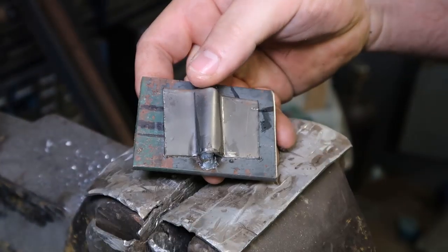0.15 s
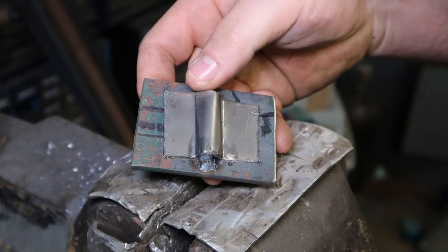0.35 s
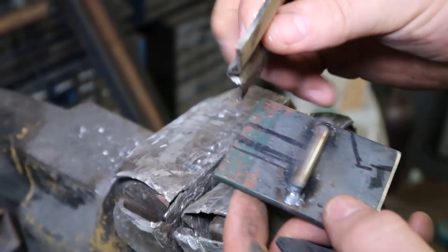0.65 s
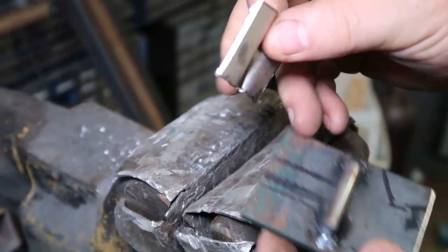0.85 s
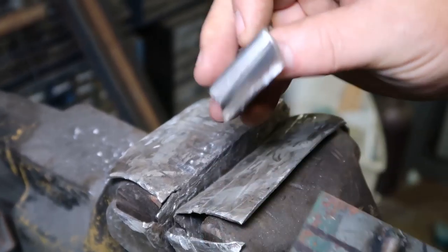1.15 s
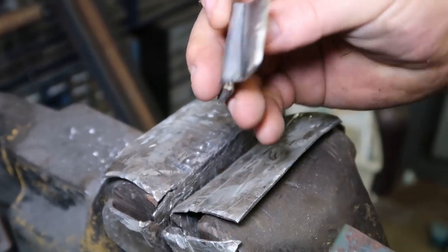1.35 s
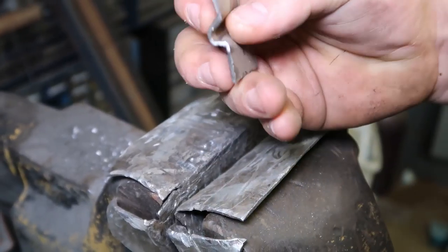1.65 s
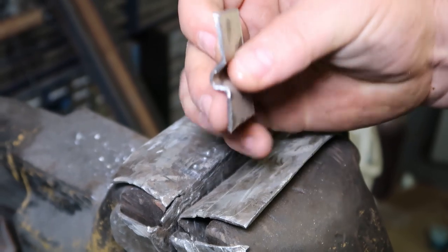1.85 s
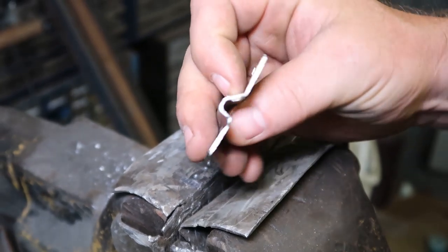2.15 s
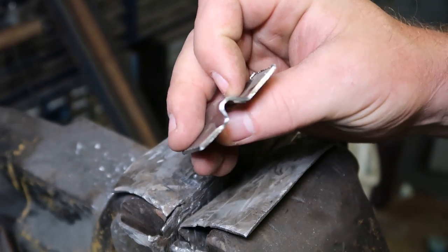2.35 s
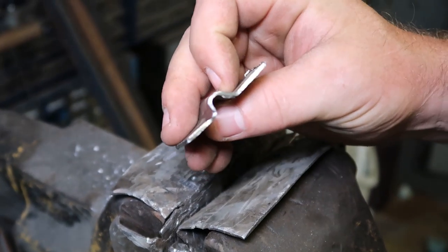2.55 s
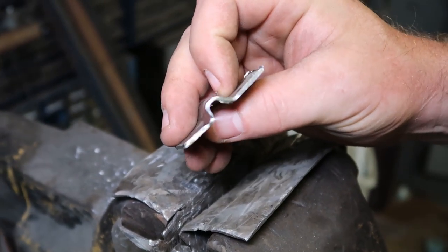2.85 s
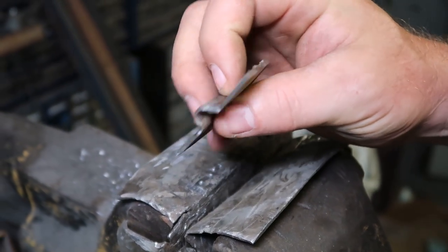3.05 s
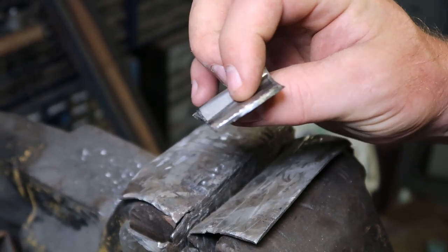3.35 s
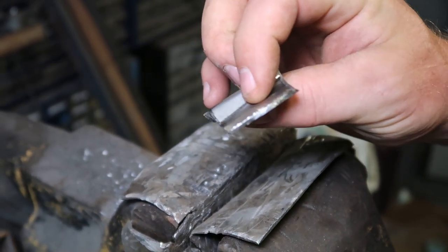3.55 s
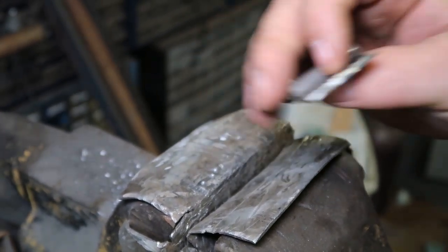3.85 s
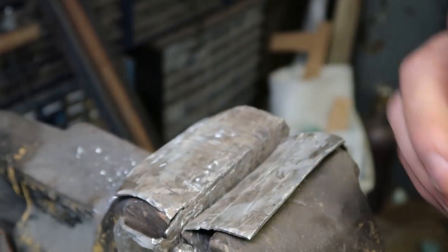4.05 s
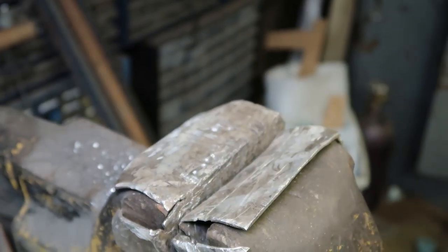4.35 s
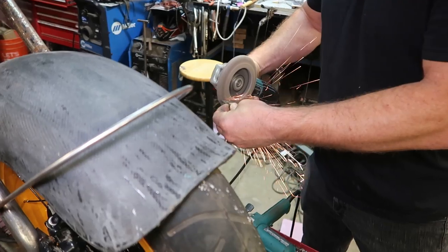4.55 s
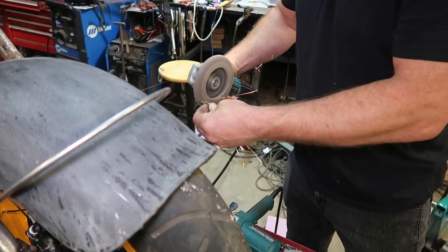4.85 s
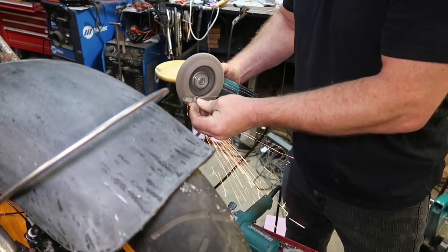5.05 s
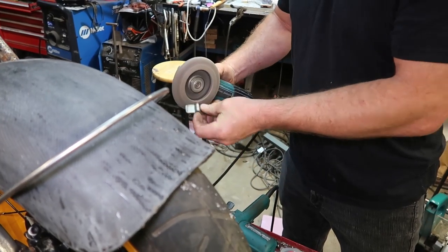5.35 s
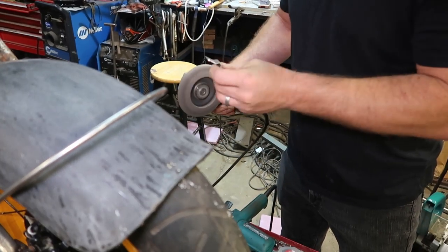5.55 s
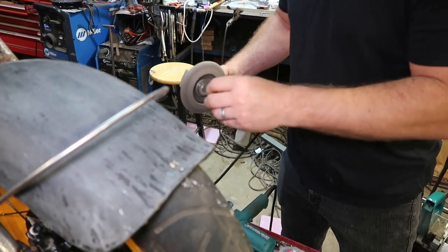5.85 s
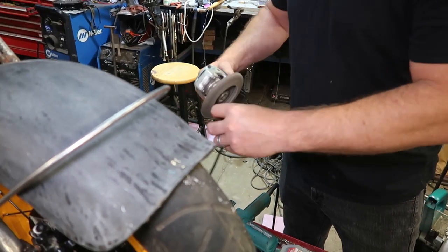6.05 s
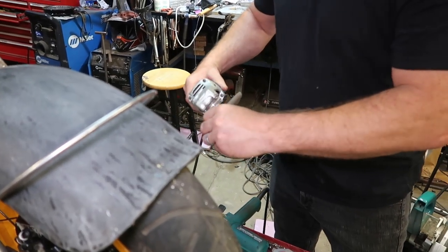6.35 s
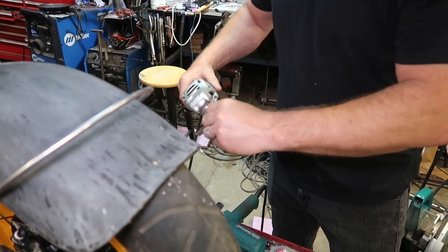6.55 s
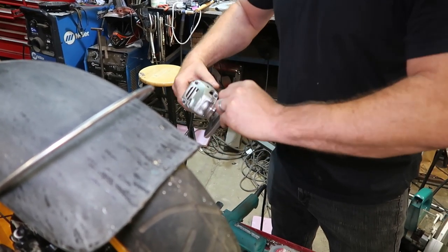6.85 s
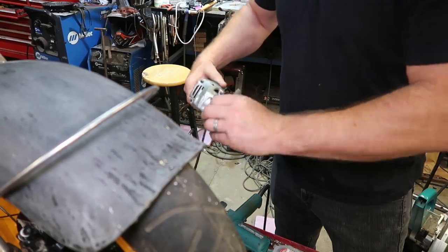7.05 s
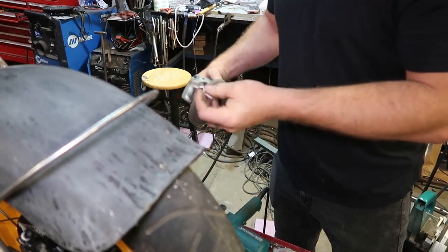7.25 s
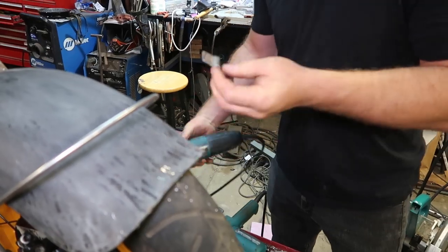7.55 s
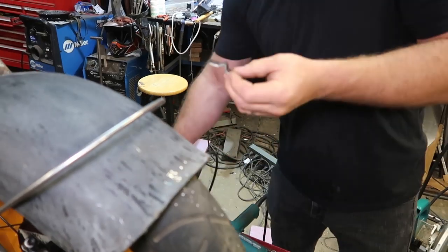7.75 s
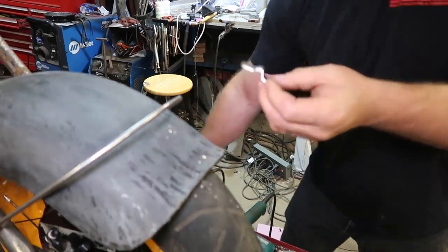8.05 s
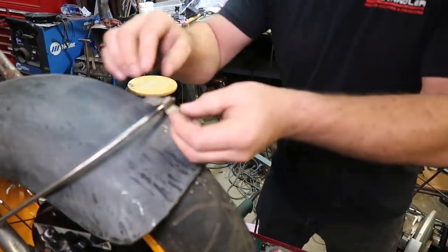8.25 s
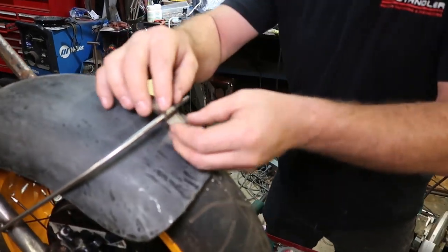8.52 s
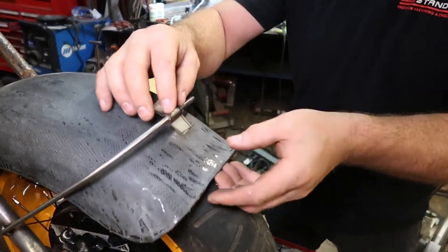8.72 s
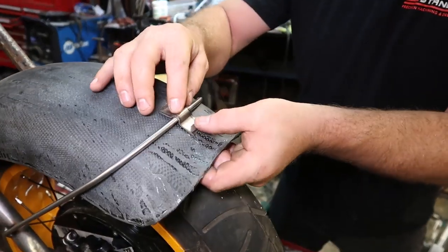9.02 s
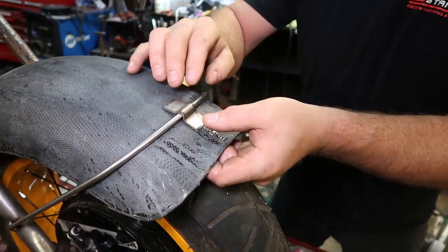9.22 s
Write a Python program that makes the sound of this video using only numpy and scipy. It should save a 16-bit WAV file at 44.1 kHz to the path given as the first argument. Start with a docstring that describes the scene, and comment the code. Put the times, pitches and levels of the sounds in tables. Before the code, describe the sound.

From 0 to 4.5 s a workshop fan drones: a steady hum near 730 Hz over soft, dull air rush, with a soft bump at about 0.6 s. A small steel bracket clinks on a vice at 4.08 s, with tiny bounces, and more faintly at 4.24 s. A very brief silence, then at 4.5 s a close angle grinder cuts in, bright hiss and whine, with low rumble at first. Power drops at 5.4 s and it coasts down, whooshing and singing, until a short raspy catch at 6.1 s. It whines back to speed, runs until 7.1 s, then slides down again. From 7.94 to 8.1 s it is laid down with metallic ticks, scrapes and low bench thuds. The fan, now about 2200 Hz, emerges. Light bracket taps on a steel fender come at 8.82, 8.88, 8.98, 9.09 and faintly 9.27 s, with brief hums.

```python
"""A workshop, where a seven-bladed fan drones: filtered noise for its air, sines at multiples of the shaft rate.
A small steel bracket turned in the fingers clinks on a vice: struck, ringing modes. A short silence follows.
In the second scene the fan drones three times higher. An angle grinder (hiss, tones and whooshes that follow
its disc and motor) dresses the bracket, coasts, restarts, coasts again and is laid down with ticks and thuds.
Then the bracket taps on a sheet-steel fender, which rings and hums."""
import sys
import numpy as np
from scipy import signal
from scipy.fft import rfft, irfft, next_fast_len
from scipy.io import wavfile
from scipy.ndimage import uniform_filter1d, map_coordinates

SR = 44100
rng = np.random.default_rng(int(sys.argv[2]) if len(sys.argv) > 2 else 0)


def master(y):
    """Save y as 16-bit WAV."""
    cut = np.clip(np.atleast_2d(y).T, -1, 1)
    pcm = np.round(cut * 32767)  # scale
    wavfile.write(sys.argv[1], SR, pcm.astype(np.int16))


N = 413658
M = next_fast_len(N)
SPAN = 5 * SR   # samples that cover either scene: the first from the start, the second up to the end
FIRST_END_S, SECOND_START_S = 4.491, 4.5095   # silence in between
SHAFT_HZ, SECOND_SHAFT_RATIO = 104.8, 2.997   # fan shaft rate in the first scene; times this in the second
GEAR = 3.68   # motor turns per disc turn
FULL_TURNS = 440   # disc turns per s at which the speed-dependent levels hold
CUTOFF_HZ = 15800

# resonances of the grinder's guard and housing: f/Hz, width/Hz, level/dB
HOUSING = [(3730, 180, 2), (4135, 290, 3.5), (4860, 940, 6.5), (6620, 170, 3.5), (7560, 160, 1),
           (9520, 260, 5.5), (10900, 510, -0.5), (12600, 280, -2)]


def from_db(db):
    """Decibels to amplitude."""
    return np.exp(np.asarray(db) * np.log(10) / 20)


def rms_one(x):
    """Scale to an rms of 1."""
    return x / np.sqrt(np.mean(x ** 2) + 1e-20)


def filtered(x, order, hz, kind="low"):
    """Butterworth filter."""
    return signal.sosfilt(signal.butter(order, hz, kind, fs=SR, output="sos"), x)


def in_time(rows):
    """Columns of a table whose first is time, one value a sample."""
    s, *columns = np.transpose(rows)
    return [np.interp(np.arange(N) / SR, s, c) for c in columns]


def bins_hz(size):
    """Frequency of every FFT bin, at least 1 Hz."""
    return np.maximum(np.arange(size // 2 + 1) * SR / size, 1)


def at_hz(points, size=M):
    """A spectrum table read at every FFT bin, straight lines over log frequency."""
    hz, value = np.transpose(points)
    return np.interp(np.log(bins_hz(size)), np.log(hz), value)


def humped(humps, size=M):
    """Bell-shaped boosts or dips in dB at every FFT bin."""
    return sum(db / (1 + (2 * (bins_hz(size) - hz) / width_hz) ** 2) for hz, width_hz, db in humps)


def swells(rows):
    """Bell-shaped envelopes, summed by power; computed every 32 samples."""
    t = np.arange(0, N, 32) / SR
    power = sum(from_db(2 * db) * np.exp(-(2 * (t - s) / length) ** 2) for s, length, db, *_ in rows)
    return np.interp(np.arange(N) / SR, t, np.sqrt(power))


def drift(rate, size=N):
    """Slow chance of spread 1: noise through a two-pole low-pass at rate Hz, drawn every 40 samples."""
    r = np.exp(-80 * np.pi * rate / SR)
    noise = rng.standard_normal(size // 40 + 2002)
    slow = signal.lfilter([1], [1, -2 * r, r * r], noise)[2000:]   # skip the settling
    return np.interp(np.arange(size) / 40, np.arange(len(slow)), rms_one(slow))


def tone(hz, waver_db, rate):
    """A sine along a pitch curve; height and phase waver together, and it is silent above the cutoff."""
    waver = waver_db * drift(rate, size=len(hz))
    phase = 2 * np.pi * np.cumsum(hz) / SR + 0.065 * waver
    return np.sqrt(2) * from_db(waver) * np.sin(phase + rng.uniform(0, 2 * np.pi)) * (hz < CUTOFF_HZ)


def whoosh(hz, half_width_hz):
    """Narrow noise of rms 1 along a pitch curve: two low-passed noises on sine and cosine carriers."""
    breadth = filtered(rng.standard_normal((2, len(hz))), 2, half_width_hz)
    phase = 2 * np.pi * np.cumsum(hz) / SR
    return rms_one(breadth[0] * np.sin(phase) + breadth[1] * np.cos(phase))


def ring(clicks, hz, t60):
    """A two-pole resonator: a unit click sets a decaying sine ringing."""
    r, w = from_db(-60 / (t60 * SR)), 2 * np.pi * hz / SR
    return signal.lfilter([0, np.sin(w)], [1, -2 * r * np.cos(w), r * r], clicks + 1e-18)


def strike(events, modes, gain_db, uneven_db, crack_db, crack_s, soft_hz):
    """Every blow excites every mode with its own strength and cracks; an optional third column tilts the blow."""
    rows = np.array(events)
    at = (rows[:, 0] * SR).astype(int)
    blow_db = rows[:, 1]
    tilt = rows[:, 2] if rows.shape[1] > 2 else 0
    first = at.min()
    size = min(at.max() + SR // 3, N) - first
    ringing = np.zeros(size)
    luck_db = rng.normal(0, uneven_db, (len(rows), len(modes)))
    for k, (hz, level_db, t60) in enumerate(modes):
        clicks = np.zeros(size)
        clicks[at - first] = from_db(blow_db + level_db + gain_db + luck_db[:, k] + tilt * np.log2(hz / 2000))
        ringing += ring(clicks, hz, t60) * (-1) ** k   # alternate signs
    clicks = np.full(size, 1e-18)
    clicks[at - first] = from_db(blow_db + crack_db + tilt)
    decay = signal.lfilter([1], [1, -np.exp(-1 / (crack_s * SR))], clicks)
    crack = np.diff(decay * rng.standard_normal(size), prepend=0)   # differencing brightens it
    out = filtered(ringing + crack, 2, min(soft_hz, .45 * SR))
    return np.pad(out, (first, N - first - size))


def fan(shaft_hz, orders, air, humps, air_db):
    """Air rushing through broad resonances, with tones at multiples of the shaft rate; one span long."""
    colour_db = at_hz(air) + humped(humps)
    rush = rms_one(irfft(rfft(rng.standard_normal(M)) * from_db(colour_db), M)[:SPAN])
    tones = sum(from_db(db) * tone(np.full(SPAN, k * shaft_hz), waver_db=1.3, rate=13.0) for k, db in orders)
    return from_db(air_db + 0.74 * drift(16.5, size=SPAN)) * rush + tones


def first_fan():
    """The fan of the first scene; seven blades pass per shaft turn, so the seventh multiple leads."""
    # shaft tones: multiple of shaft rate, level/dB
    order_rows = [(2, -60.5), (4, -60.5), (5, -53), (6, -51), (8, -50.5), (14, -48), (15, -56), (16, -49.5),
                  (21, -64.5), (24, -56.5), (28, -57.5)]
    # relative spectrum of the air: f/Hz, level/dB
    air_rows = [(15, -61), (25, -35.5), (60, -26.5), (117, -29.5), (200, -15.5), (278, -13), (469, -17.5),
                (731, -18.5), (1330, -23), (1600, -22.5), (2100, -25.5), (5200, -34.5), (8120, -49.5),
                (12000, -62), (13500, -100)]
    # housing and room resonances: f/Hz, width/Hz, level/dB
    hump_rows = [(283, 25, 7), (365, 12, 9.5), (610, 210, 4.5), (710, 57, 4), (1178, 43, 5.5),
                 (1600, 160, 1.5), (2510, 200, 2), (5260, 250, 1), (436, 127, -12)]
    # blade tone: t/s, level/dB
    blade_rows = [(0, -33), (.3, -31), (.57, -35.5), (.6, -29.5), (1.3, -31.5), (4.48, -31.5)]
    body = np.pad(fan(SHAFT_HZ, order_rows, air_rows, hump_rows, air_db=-35), (0, N - SPAN))
    blade = tone(np.full(N, 7 * SHAFT_HZ), waver_db=0.87, rate=18.0)
    return body + from_db(in_time(blade_rows)[0]) * blade


def thumps():
    """Soft low bumps: one smooth push of 2.2 ms each."""
    # t/s, peak/dB
    thump_rows = [(0.586, -34), (5.4, -54), (6.107, -61)]
    out, push = np.zeros(N), np.hanning(int(0.0022 * SR))
    for s, peak_db in thump_rows:
        out[int(s * SR):int(s * SR) + len(push)] += from_db(peak_db) * push
    return out


def clinks():
    """Steel on steel: each blow and bounce on the vice rings the bracket's modes."""
    # blows and bounces, relative: t/s, level/dB, brightness/dB per octave
    blow_rows = [(4.079, -10.5, -1.5), (4.082, -23, 6), (4.086, -26, 7), (4.2385, -19, -3.5),
                 (4.2425, -38, 4)]
    # bracket modes: f/Hz, level/dB, t60/s
    mode_rows = [(2420, -6, .018), (2643, -6, 0.022), (3200, -5, 0.018), (3700, -10, .012),
                 (4490, -5, 0.125), (4560, -2, .03), (4950, -5, 0.04), (5650, -9, 0.025), (7200, -19, 0.05),
                 (9534, -23, .04), (10970, -21, .04)]
    struck = strike(blow_rows, mode_rows, gain_db=-5, uneven_db=1.5, crack_db=-25, crack_s=.003, soft_hz=6500)
    return filtered(struck, 10, 11600)


def second_fan():
    """The fan of the second scene, its tones three times higher and its level uneven."""
    # shaft tones: multiple of shaft rate, level/dB
    order_rows = [(4, -59), (6, -54), (8, -57), (12, -52), (16, -56), (21, -55), (28, -64)]
    # relative spectrum of the air: f/Hz, level/dB
    air_rows = [(15, -60), (25, -38), (75, -46), (200, -34.5), (324, -21), (555, -24.5), (727, -4.5),
                (1460, -15), (1900, -8), (2500, -7), (3470, -14.5), (4300, -15.5), (6450, -19.5),
                (15700, -25.5)]
    # resonances: f/Hz, width/Hz, level/dB
    hump_rows = [(733, 85, 6), (1160, 67, 5.5), (1300, 190, -11), (163, 33, 8)]
    # gain of all but the blade tones, sinking under the grinder, rising briefly at the thuds: t/s, level/dB
    gain_rows = [(4.5, -6), (5.3, -22.5), (5.7, -7.5), (6.0, -4.5), (6.3, -10.5), (7.0, -10), (7.7, -4.5),
                 (7.98, 0), (8.0, 4.5), (8.06, 1.5), (8.1, 8), (8.14, 1), (8.26, 1), (8.5, -0.5), (8.8, 1),
                 (9.38, 0)]
    # blade tone and its octave: t/s, tone level/dB, octave level/dB
    blade_rows = [(4.5, -51, -66), (5.3, -63, -62), (6.0, -44, -57), (6.2, -51, -68), (7.1, -53, -69),
                  (7.3, -48, -50), (7.6, -42, -48), (7.9, -38, -44.5), (8.1, -38, -50), (8.14, -39, -54),
                  (8.27, -37.5, -61), (8.52, -35, -62), (8.9, -34, -51), (9.38, -34, -56)]
    shaft_hz = SECOND_SHAFT_RATIO * SHAFT_HZ
    body = np.pad(fan(shaft_hz, order_rows, air_rows, hump_rows, air_db=-38), (N - SPAN, 0))
    blade_db, octave_db = in_time(blade_rows)
    blade = from_db(blade_db) * tone(np.full(N, 7 * shaft_hz), waver_db=1.0, rate=13.0)
    octave = from_db(octave_db) * tone(np.full(N, 14 * shaft_hz), waver_db=1.0, rate=13.0)
    return from_db(in_time(gain_rows)[0]) * body + blade + octave


def disc():
    """Speed closes on the loaded speed under power and decays when coasting; tones and grit follow both."""
    # spells under power: start t/s, end t/s, starting speed/turns per s, wobble tone level/dB,
    # its octave level/dB, gear whine level/dB, share of the hiss that repeats each turn/0-1
    pass_rows = [(4.5, 4.92, 440, -51, -75, -58, .5), (4.92, 5.39, 425, -69, -80, -52, .2),
                 (6.11, 7.11, 345, -61, -62, -34, .09)]
    # speed the motor pulls towards: t/s, disc speed/turns per s
    loaded_rows = [(4.5, 438), (4.6, 425), (4.72, 405), (4.82, 425), (4.95, 447), (5.1, 444), (5.39, 439),
                   (6.1, 350), (6.19, 352), (6.2, 520), (6.33, 470), (6.45, 461), (6.6, 468), (6.8, 474),
                   (7.11, 464)]
    # motor tone under power, then coasting: disc speed/turns per s, level/dB
    powered_rows = [(300, -71), (445, -57), (460, -51), (472, -50)]
    coasting_rows = [(80, -90), (135, -68), (160, -57), (220, -52), (270, -49), (350, -50), (400, -58),
                     (430, -66)]
    # the whine is strongest on the climb to full speed: disc speed/turns per s, level/dB
    gear_rows = [(370, -22), (398, -2), (440, -1), (461, 0), (466, -4), (472, -6)]
    spin_up_s, coast_s, switch_s = .15, .91, .12   # time constants; averaging time of the level changes
    friction, slowest = 160, 80   # bearing drag (turns per s per s) when coasting, down to a crawl (turns per s)

    t, step = np.arange(N - SPAN, N) / SR, 40
    on = np.array([(t >= start) & (t < end) for start, end, *_ in pass_rows])
    powered, pull = on.any(axis=0), in_time(loaded_rows)[0][-SPAN:]
    speed = [pull[0]]
    starts = {int((s - t[0]) * SR) // step: first for s, _, first, *_ in pass_rows}
    driven = powered | (t < SECOND_START_S)
    for k, (drive, goal) in enumerate(zip(driven[::step], pull[::step])):
        speed[-1] = starts.get(k, speed[-1])
        change = (goal - speed[-1]) / spin_up_s if drive else -speed[-1] / coast_s - friction
        speed.append(speed[-1] + step / SR * change)
    turns = np.interp(np.arange(SPAN) / step, np.arange(len(speed)), np.maximum(speed, slowest))

    _, _, _, wobble_db, octave_db, gear_db, repeats = np.transpose(pass_rows) @ on
    wobble_db = np.where(powered, wobble_db, -60.5) + 13 * np.log2(turns / FULL_TURNS)
    motor_on_db = np.interp(turns, *np.transpose(powered_rows))
    motor_off_db = np.interp(turns, *np.transpose(coasting_rows))
    motor_db = np.where(powered, motor_on_db, motor_off_db)
    gear_db = np.where(powered, gear_db + np.interp(turns, *np.transpose(gear_rows)), -80)
    octave_db = np.where(powered, octave_db, -80)
    repeats = np.where(powered, repeats, 0.0091)
    settings = [wobble_db, octave_db, motor_db, gear_db, repeats]
    return turns, *uniform_filter1d(settings, int(switch_s * SR))


def hiss_db():
    """The reference level of the grinder hiss, dying away after its last point."""
    # t/s, level/dB
    hiss_rows = [(4.52, -28.5), (4.8, -29), (5.03, -29.5), (5.4, -28), (5.94, -25), (6.08, -27),
                 (6.17, -28.5), (6.3, -27), (7.2, -27.5), (7.6, -25), (7.9, -30)]
    s, db = hiss_rows[-1]
    end_s, fade_db_per_s = 8.22, 21
    return in_time(hiss_rows + [(end_s, db - fade_db_per_s * (end_s - s)), (end_s + .1, -90)])[0]


def grinding_hiss(turns, repeats):
    """Contact noise: a rough rim passing again each turn plus fresh noise, in bands that follow disc speed."""
    # overlapping bands: f/Hz, level/dB, speed slope/dB per octave of disc speed
    band_rows = [(288, -81, 11), (920, -28, 3.5), (2270, -12.5, 1), (4900, -7.5, 5), (8340, -2, 4),
                 (10940, -4, 2.5), (14200, 2, 8.5)]
    angle = np.cumsum(turns * (1 + .002 * drift(24.6, size=SPAN))) / SR
    grit = rng.standard_normal((400, 129))   # the rim wears into a new pattern row by row, 30 rows a second
    grit[:, -1] = grit[:, 0]   # close the circle
    rim = map_coordinates(grit, [np.arange(SPAN) / SR * 30.0, angle % 1 * 128], order=1)
    rim = rms_one(filtered(np.diff(rim, prepend=0), 2, 7500, "high"))   # repeating grit is heard mostly up here
    repeats = np.clip(repeats, 0, 1)
    contact = np.sqrt(repeats) * rim + np.sqrt(1 - repeats) * rng.standard_normal(SPAN)
    spectrum = rfft(contact) * from_db(humped(HOUSING, size=SPAN))
    hiss, together, level_db = 0, drift(29, size=SPAN), hiss_db()[-SPAN:]
    for centre_hz, band_db, speed_db in band_rows:
        peak = [(16, 0.026)] + [(hz, hz == centre_hz) for hz, *_ in band_rows]   # one at its own centre
        band = at_hz(peak, size=SPAN) ** 1.31
        gain_db = level_db + band_db + speed_db * np.log2(turns / FULL_TURNS)
        gain_db = gain_db + 0.63 * together + 0.45 * drift(34, size=SPAN)
        hiss = hiss + from_db(gain_db) * rms_one(irfft(spectrum * band, SPAN))
    return hiss


def motor_and_gears(turns, motor_db, gear_db):
    """Tones locked to the motor rate, and blurred whooshes that slide through the housing resonances."""
    # motor tones, then gear tones: multiple of motor rate, level/dB
    motor_rows = [(1, -1.5), (24, 13)]
    gear_rows = [(4, -1.5), (11, -2)]
    # whooshes: multiple of motor rate, level/dB, half-width/Hz
    whoosh_rows = [(4, 6, 170), (10.33, 17, 200)]
    # colour of the whooshes: f/Hz, level/dB
    colour_rows = [(3000, 0), (8500, 0), (11000, -10), (16000, -20)]
    motor_hz = GEAR * turns
    motor = sum(from_db(motor_db + db) * tone(k * motor_hz, waver_db=2.5, rate=15.0) for k, db in motor_rows)
    gears = sum(from_db(gear_db + db) * tone(k * motor_hz, waver_db=2.5, rate=25.0) for k, db in gear_rows)
    sliding = sum(from_db(motor_db + db) * whoosh(k * motor_hz, width) for k, db, width in whoosh_rows)
    colour_db = humped(HOUSING, size=SPAN) + at_hz(colour_rows, size=SPAN)
    return motor + gears + irfft(rfft(sliding) * from_db(colour_db), SPAN)


def grinder():
    """Hiss, motor and gears, with the disc's wobble heard as a tone at its turning rate and the octave."""
    turns, wobble_db, octave_db, motor_db, gear_db, repeats = disc()
    wobble = from_db(wobble_db) * tone(turns, waver_db=2.0, rate=11.0)
    octave = from_db(octave_db) * tone(2 * turns, waver_db=3.5, rate=13.0)
    out = grinding_hiss(turns, repeats) + motor_and_gears(turns, motor_db, gear_db) + wobble + octave
    return np.pad(out, (N - SPAN, 0))


def flares():
    """Narrow noise at each housing resonance swells and wanders slightly in pitch by chance."""
    out = 0
    for hz, half_width_hz, _ in HOUSING:
        swing_db = 4 * drift(2.6, size=SPAN)
        pitch = hz * (1 + .02 * drift(1.5, size=SPAN))
        out = out + from_db(swing_db) * whoosh(pitch, half_width_hz)
    return np.pad(from_db(hiss_db()[-SPAN:] - 21.5) * out, (N - SPAN, 0))


def drone():
    """Noise ringing in one housing resonance, following the hiss, with a few short swells."""
    # swells: middle t/s, length/s, level/dB
    swell_rows = [(4.7, 0.26, -42), (5.07, 0.035, -53), (5.31, 0.062, -45), (5.94, .06, -49),
                  (6.3, .08, -41)]
    level = np.hypot(from_db(hiss_db() - 23 + 3.0 * drift(6.2)), swells(swell_rows))
    return level * rms_one(ring(rng.standard_normal(N), hz=1958, t60=4.0 / 51))


def singing():
    """Chattering contact: the disc's high spot ticks once a turn, with noise, through the bracket's resonance."""
    # louder bursts, relative: middle t/s, length/s, level/dB, f/Hz
    burst_rows = [(5.09, 0.11, -24, 11100), (5.21, 0.067, -25, 10900), (5.66, 0.06, -20.5, 10500),
                  (5.9, 0.045, -28, 10900), (6.02, 0.037, -25, 10560), (6.08, 0.038, -19.5, 10600),
                  (6.2, 0.16, -22, 10940), (7.4, 0.11, -22.5, 10100), (7.52, 0.065, -28, 10300),
                  (7.94, 0.028, -30, 10420)]
    level = np.hypot(from_db(hiss_db() - 5.5 + 0.7 * drift(0.59)), swells(burst_rows))
    turns = np.pad(disc()[0], (N - SPAN, 0))
    ticks = np.diff(np.floor(np.cumsum(turns) / SR), prepend=0)
    share = 0.82 * np.clip((450 - turns) / 60, .15, 1)   # ticks stand out below 450 turns per s
    rub = np.sqrt(share) * rms_one(ticks) + np.sqrt(1 - share) * rng.standard_normal(N)
    rub = rub * from_db(3.0 * drift(60))
    # shift the moving resonance down to 0 Hz, low-pass there, and shift it back
    spin = np.exp(2j * np.pi * np.cumsum(in_time(burst_rows)[-1]) / SR)
    rung = spin * filtered(rub / spin, 2, 360)
    rung = rung.real / np.sqrt(uniform_filter1d(np.abs(rung) ** 2, 4000) / 2 + 1e-12)   # even out the level
    return level * from_db(-5.0) * rung


def rumbles():
    """Lumpy low stereo noise, during the work and after it, that starts and stops within 10 ms."""
    # start t/s, end t/s, level/dB, fade/dB per s, low edge f/Hz, high edge f/Hz, side against middle level/dB
    rumble_rows = [(4.511, 4.92, -46.5, 28, 40.3, 1220, -1), (7.724, 8.3, -78, 1, 40.6, 206, -22),
                   (7.974, 8.256, -36.5, 42, 313, 1670, -46), (8.545, 9.4, -71, 0, 122, 171, -35)]
    t, out = np.arange(N - SPAN, N) / SR, 0
    for start, end, level_db, fade, low_hz, high_hz, side_db in rumble_rows:
        mid, side = filtered(rng.standard_normal((2, SPAN)), 2, [low_hz, high_hz], "band")
        noise = rms_one(mid + from_db(side_db) * side * [[1], [-1]])
        gain = from_db(level_db - fade * np.abs(t - start) + 1.5 * drift(7.9, size=SPAN))
        gate = np.clip(np.minimum(t - start, end - t) / 0.0099, 0, 1)
        out = out + gain * noise * gate
    return np.pad(out, ((0, 0), (N - SPAN, 0)))


def strong_flares():
    """The strongest flares of single resonances: narrow noise that swells and fades."""
    # middle t/s, length/s, level/dB, f/Hz
    flare_rows = [(4.66, .1, -40, 8800), (4.92, .1, -39, 4150), (5.04, 0.15, -33.5, 6400),
                  (5.35, .08, -36, 6550), (5.5, .15, -41, 9350), (5.75, 0.26, -35, 9500),
                  (5.658, .12, -37, 4370), (5.926, 0.099, -35, 6650), (5.973, .14, -34, 8000),
                  (6.456, 0.14, -35, 10750), (7.32, .2, -40, 12250), (7.693, 0.074, -33, 6650),
                  (7.732, .2, -38, 12400), (8.15, .2, -48, 12500)]
    out = np.zeros(N)
    for s, length, level_db, hz in flare_rows:
        t = np.arange(-int(length * SR), int(length * SR))
        bell = np.exp(-2 * (t / SR / length) ** 2) * np.hanning(len(t)) ** .5
        out[int(s * SR) + t] += from_db(level_db) * bell * whoosh(np.full(len(t), hz), half_width_hz=120)
    return out


def rasps():
    """Steel scraping steel: dense uneven clicks in a broad band, starting at once and fading."""
    # t/s, fade time/s, level before the fade/dB, centre f/Hz, click rate/per s
    rasp_rows = [(6.1065, 0.035, -28, 6700, 2400), (6.1066, 0.0044, -29, 1840, 2300),
                 (7.938, 0.012, -32, 10500, 5000), (7.987, .018, -30, 3600, 4500),
                 (8.069, 0.03, -33, 4400, 5000), (8.069, 0.038, -33, 8000, 10000),
                 (8.025, 0.045, -33, 2480, 1500), (8.048, 0.02, -33, 2480, 1500),
                 (8.097, .02, -31, 2800, 3000), (8.8776, 0.011, -31, 6000, 3000)]
    out = np.zeros(N)
    for s, length, level_db, hz, per_s in rasp_rows:
        t = np.arange(int(3 * length * SR)) / SR
        clicks = (rng.random(len(t)) < per_s / SR) * rng.uniform(-1, 1, len(t))
        clicks += 0.12 * rng.standard_normal(len(t))
        clicks[0] = -1   # the first bite
        burst = rms_one(filtered(clicks, 2, [hz * .55, min(hz * 1.5, .45 * SR)], "band"))
        out[int(s * SR):int(s * SR) + len(t)] += from_db(level_db) * burst * np.exp(-(t / length) ** 1.5)
    return out


def catch():
    """The disc catches the bracket once a turn: ten ticks through its damped modes, each blow a little weaker."""
    # bracket modes damped by the fingers: f/Hz, level/dB, t60/s
    mode_rows = [(1400, -20, .006), (2200, -13, .008), (4250, -8, .012), (4950, -6, .01), (6700, -2, .014),
                 (7300, -2, .011), (8200, -5, .008), (10200, -4, .01)]
    start_s, turn_s, first_db, loss_db = 6.1068, .0029, -8, .7   # relative level and its loss per turn
    ticks = [(start_s + k * turn_s, first_db - k * loss_db) for k in range(10)]
    return strike(ticks, mode_rows, gain_db=-7, uneven_db=2.5, crack_db=-10, crack_s=0.00051, soft_hz=13000)


def soft_modes(rows):
    """Single modes swelling and fading as wavering sines."""
    out = np.zeros(N)
    for s, length, level_db, hz in rows:
        t = np.arange(-int(2 * length * SR), int(2 * length * SR))
        bell = np.exp(-2 * (t / SR / length) ** 2)
        out[int(s * SR) + t] += from_db(level_db) * bell * tone(np.full(len(t), hz), waver_db=2.0, rate=23.0)
    return out


def chirp():
    """One clear ring after the catch: a sine under a bell-shaped envelope."""
    # middle t/s, length/s, level/dB, f/Hz
    chirp_row = (6.161, .034, -38, 1970)
    return soft_modes([chirp_row])


def guard_ticks():
    """The guard ticks as the grinder is laid down: small blows on bright metal modes."""
    # blows, relative: t/s, level/dB, brightness/dB per octave
    blow_rows = [(7.9378, -31, 6), (7.9465, -34, 2), (7.9625, -34, 4), (7.9866, -22, -2), (8.0695, -20, 1),
                 (8.0745, -31, 3)]
    # guard modes: f/Hz, level/dB, t60/s
    mode_rows = [(4300, -8, 0.037), (5640, -12, 0.018), (6760, -13, 0.028), (7500, -10, .03),
                 (8500, -5, .03), (10050, -6, .035), (10900, -3, .025), (13500, -6, .012)]
    return strike(blow_rows, mode_rows, gain_db=-9, uneven_db=8.0, crack_db=-5, crack_s=.001, soft_hz=15000)


def bench_thuds():
    """The grinder lands on the bench: each blow and bounce excites the bench's low modes."""
    # blows and bounces, relative: t/s, level/dB
    blow_rows = [(7.9861, -9), (7.9892, -15), (7.9928, -13), (8.0002, -20), (8.0965, -13), (8.0998, -13.5),
                 (8.105, -26), (8.1115, -27)]
    # bench modes: f/Hz, level/dB, t60/s
    mode_rows = [(340, -0.5, 0.12), (437, -8, 0.085), (500, -5, .05), (670, -6.5, 0.045), (806, -11, 0.033),
                 (950, -2, 0.029), (1100, -10, 0.032), (1265, -6, 0.024), (1520, -5, 0.025),
                 (1850, -6, 0.028), (2350, 1, 0.024), (2710, -5, 0.02), (3370, -12, .04), (4200, -15, .04)]
    return strike(blow_rows, mode_rows, gain_db=-9.0, uneven_db=3.5, crack_db=-12.5, crack_s=0.0094, soft_hz=4400)


def fender_taps():
    """The bracket taps the sheet steel, ringing its short modes; the sheet hums briefly as it is pressed."""
    # blows, relative: t/s, level/dB, brightness/dB per octave
    blow_rows = [(8.8203, -18.5, -5), (8.8228, -29, 6), (8.8255, -28, 6.5), (8.8776, -23, 0),
                 (8.8787, -23, 5), (8.8803, -26, 7), (8.8825, -27, 2), (8.887, -31, 3), (8.9757, -23, 4),
                 (8.9775, -23, 3), (9.0868, -25, 3.5), (9.0905, -36, 3), (9.2656, -33, 5)]
    # fender modes: f/Hz, level/dB, t60/s
    mode_rows = [(328, -10, 0.037), (628, -5, 0.04), (880, -5, 0.027), (1270, 1.5, 0.023), (2100, 9, 0.018),
                 (2600, 3.5, .015), (3230, 5, 0.016), (3860, 1, 0.013), (4780, 3, 0.016), (5750, -1, 0.011),
                 (6620, 2, 0.012), (7740, -10, .012)]
    # hums: middle t/s, length/s, level/dB, f/Hz
    hum_rows = [(8.855, .025, -50, 330), (8.868, 0.041, -43, 602), (8.915, 0.036, -48, 500),
                (8.98, .045, -54, 495)]
    taps = strike(blow_rows, mode_rows, gain_db=-13.5, uneven_db=2.5, crack_db=-10, crack_s=0.0026, soft_hz=8000)
    return taps + soft_modes(hum_rows)


def low_cut(x):
    """A wind filter at 460 Hz with a steep foot at 220 Hz."""
    return filtered(filtered(x, 4, 460, "high"), 8, 220, "high")


def spread(x, alike, pan, lag):
    """Two close capsules: scattered room sound differs between them where the likeness falls."""
    tail = rng.standard_normal(8000) * np.exp(-np.arange(8000) / (0.018 * SR))
    scatter = rfft(rms_one(tail) / np.sqrt(8000), M)
    alike = np.clip(at_hz(alike), 0, .9999)
    mid, side = rfft(x, M), scatter * np.sqrt((1 - alike) / (1 + alike))
    lean = from_db(at_hz(pan) / 2)
    left = irfft(mid * (1 + side) * lean, M)[:N]
    right = irfft(mid * (1 - side) / lean, M)[:N]
    return np.array([np.roll(left, lag), right])   # lag in samples


def scene():
    """Two scenes in stereo, a short silence between them."""
    # left-right likeness of the first scene, of fan and fender, of the grinder: f/Hz, likeness/0-1
    first_alike = [(60, .9), (150, .95), (380, .99), (690, .9999), (780, .9999), (1300, .93), (2380, .88),
                   (5980, .4), (12000, .2)]
    fan_alike = [(60, .99), (450, 1), (740, 1), (1220, .998), (1900, 1), (2200, 0.99), (2600, 1), (3330, 1),
                 (5500, 0.7), (9080, .67), (15000, .43)]
    grinder_alike = [(100, .8), (270, 1), (500, 1), (3800, 1), (5500, 1), (9080, 0.95), (15000, 0.69)]
    # balance of the first scene, of fan and fender: f/Hz, left minus right level/dB
    first_pan = [(60, -2.1), (15000, -2.1)]
    fan_pan = [(60, -2.5), (1300, 0), (2000, -0.2), (3300, -1.5), (5500, -1), (15000, 0)]
    t = np.arange(N) / SR
    bumps = thumps()
    first = spread(first_fan() + bumps + clinks(), first_alike, first_pan, lag=1)
    work = grinder() + flares() + drone() + singing() + strong_flares() + rasps() + catch() + chirp()
    work += guard_ticks() + bench_thuds()
    fan_and_fender = spread(second_fan() + low_cut(fender_taps()), fan_alike, fan_pan, lag=0)
    grinding = spread(low_cut(work) + bumps, grinder_alike, [(60, 0)], lag=0)
    second = fan_and_fender + grinding + rumbles()
    return first * (t < FIRST_END_S) + second * (t >= SECOND_START_S)


def record(dry):
    """The top is cut steeply."""
    return signal.sosfilt(signal.cheby2(16, 70, CUTOFF_HZ * 1.03, fs=SR, output="sos"), dry)


dry = scene()
out = record(dry)
master(out)
```